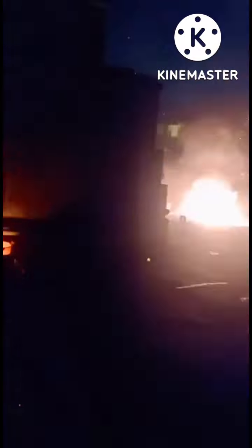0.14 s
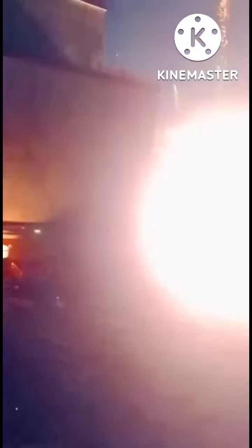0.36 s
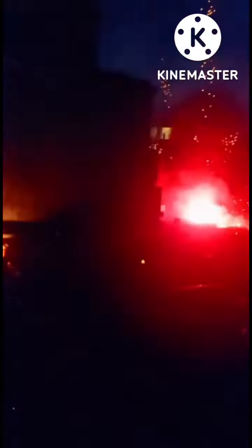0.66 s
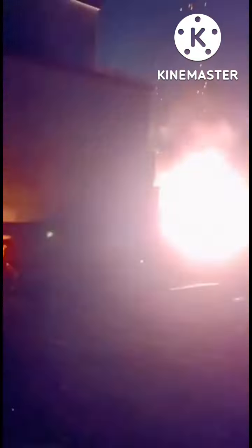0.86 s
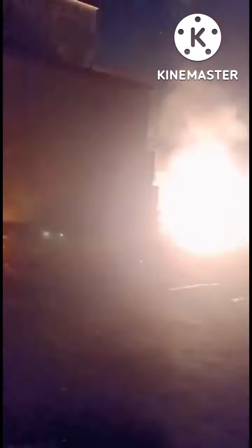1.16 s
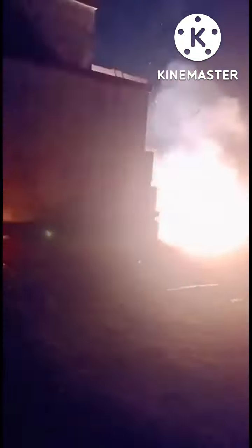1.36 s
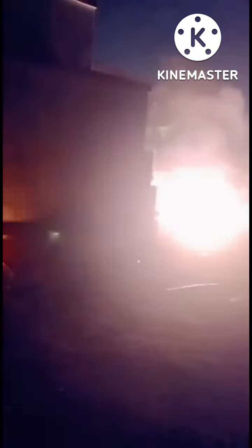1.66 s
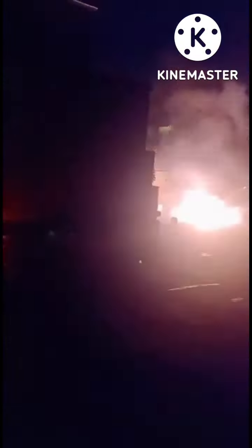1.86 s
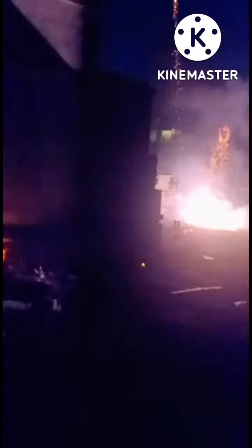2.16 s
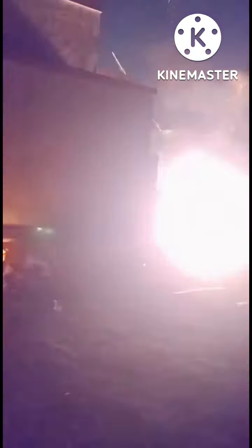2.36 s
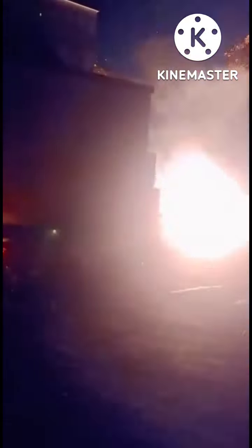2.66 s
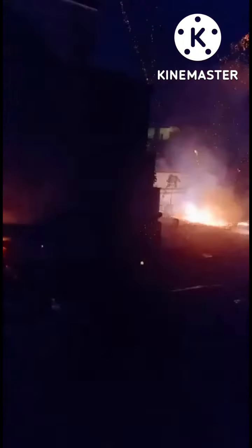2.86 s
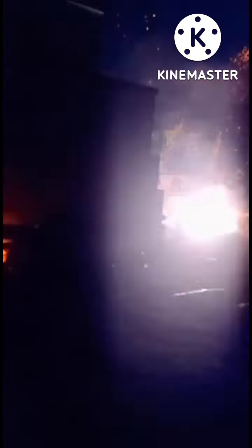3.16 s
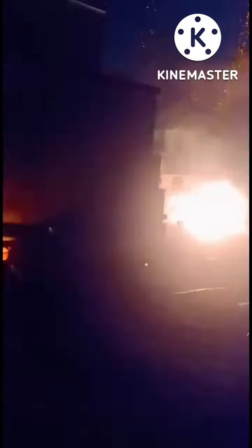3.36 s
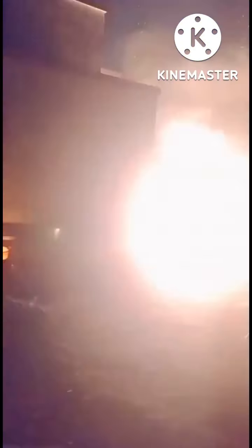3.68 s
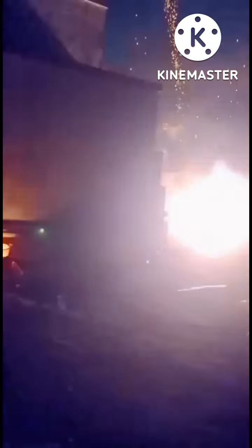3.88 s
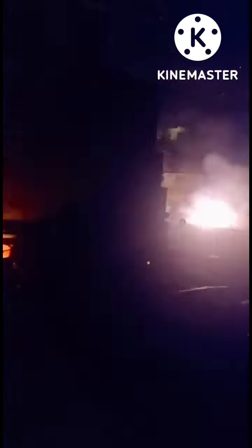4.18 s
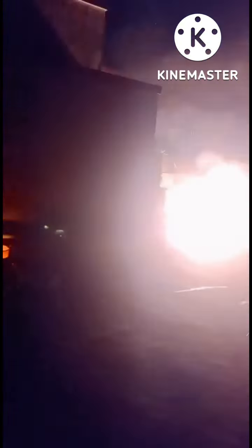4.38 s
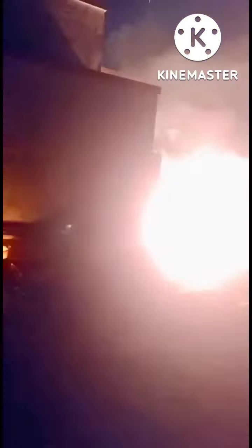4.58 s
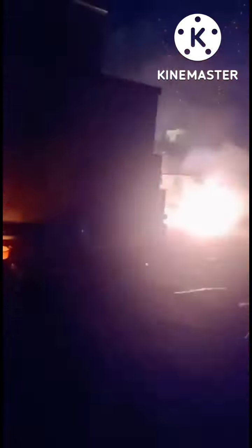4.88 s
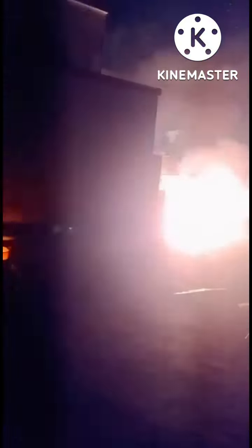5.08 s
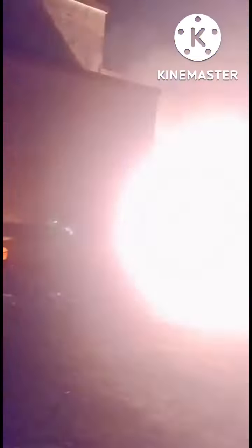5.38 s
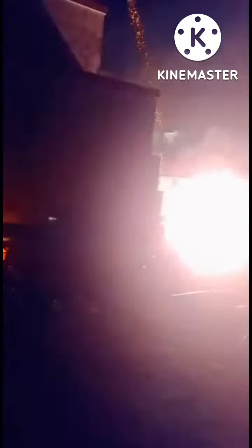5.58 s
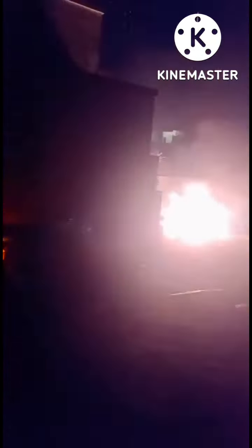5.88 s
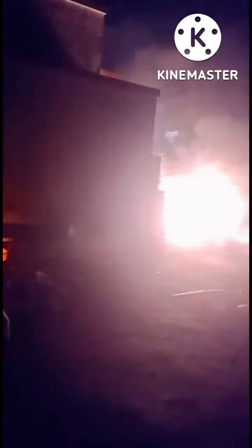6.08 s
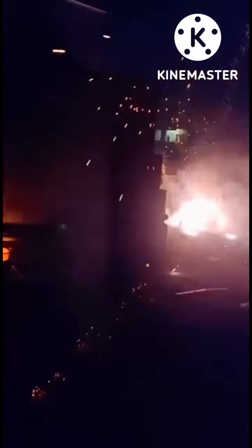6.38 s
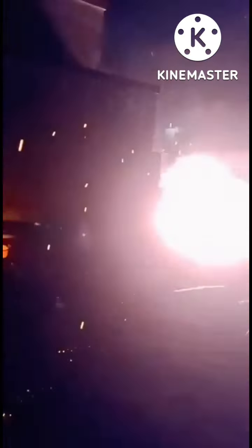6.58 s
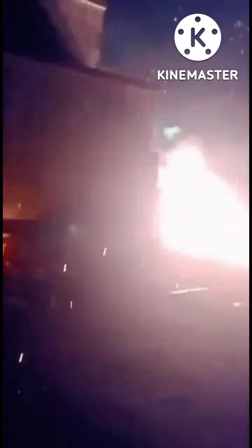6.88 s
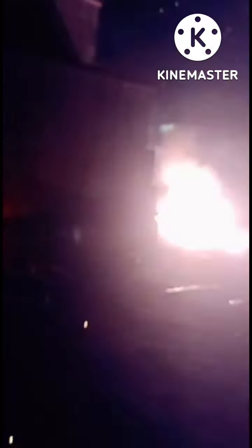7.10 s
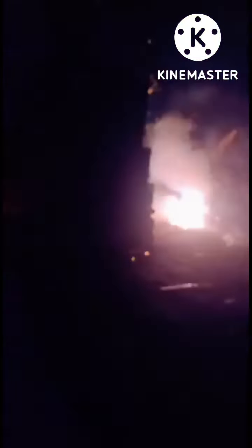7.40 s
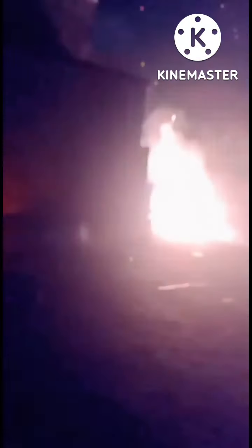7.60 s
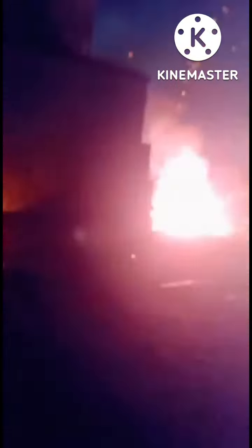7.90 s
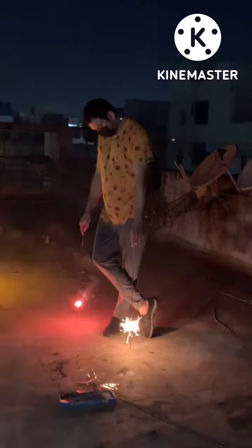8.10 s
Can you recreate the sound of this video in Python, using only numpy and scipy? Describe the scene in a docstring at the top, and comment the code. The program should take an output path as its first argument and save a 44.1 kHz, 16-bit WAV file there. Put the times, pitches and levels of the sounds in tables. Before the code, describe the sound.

A string of firecrackers goes off close by in a rapid, uneven chain of sharp bangs echoing off nearby walls.

```python
"""A string of firecrackers goes off a few metres from a stereo microphone pair in a walled street at night.
Each bang arrives as a low thump and a short crack, comes back from the near walls and dies in a grainy
rumble of far echoes. The fuse sizzles in the first pause; the neighbourhood is a faint, steady noise.
The street fades out near 8 s; after a short silence a brighter scene cuts in with a hiss and one pop."""
import sys
import numpy as np
from scipy import signal
from scipy.fft import rfft, irfft
from scipy.io import wavfile

SR = 44100
rng = np.random.default_rng(int(sys.argv[2]) if len(sys.argv) > 2 else 0)


def transcribe(signal):
    """Save signal, clipped to [-1, 1], as a 16-bit WAV file at the path in sys.argv[1]."""
    frames = np.atleast_2d(signal).T
    limited = np.clip(frames, -1, 1)
    pcm = np.round(limited * 32767).astype(np.int16)
    wavfile.write(sys.argv[1], SR, pcm)


N = 363805
SPOTS, FOLLOWERS = 6, 5   # spots on the string, each with its own echoes; weak clicks after a crack

# firecracker bangs, and some of their wall echoes about 30 ms later:
# t/s, relative crack level/dB, body/dB re crack, street send/dB re crack
ARRIVALS = [(0.0004, -18, 7, -3), (0.0224, -12.5, -10, -3.5), (0.0531, -11, -18, -10.5),
            (0.389, -34, -2, -13), (0.4201, -27.5, -11.5, -8), (0.5306, -53, 14, -22),
            (0.5966, -16, -11.5, -6.5), (0.6367, -23.5, 2.5, -6), (0.7105, -34, 0, -4.5),
            (0.8719, -16, -17, -4), (0.8988, -15, 3, -8.5), (0.941, -24, 10.5, -9), (1.077, -16, 2.5, -8.5),
            (1.1461, -11, -16, -7.5), (1.3032, -15.5, -1.5, -12.5), (1.3347, -31.5, -22, -0.5),
            (1.37, -21, 1.5, -8.5), (1.4294, -28, -2, -4.5), (1.4599, -27.5, -13, -23),
            (1.5055, -15.5, -9.5, 1), (1.5117, -4.5, -10.5, -14), (1.5728, -15.5, 9, -4),
            (1.6971, -18.5, 2, -15), (1.7879, -20.5, 1.5, 1), (1.8246, -16, 2, -8), (1.952, -13, -9.5, -2),
            (1.9828, -13.5, -28, -2.5), (2.0681, -19.5, -5, -8.5), (2.0996, -27.5, 4, -6.5),
            (2.2045, -18, -5, -1), (2.2304, -11, -16.5, -5), (2.367, -18, -32, -6.5),
            (2.419, -19, -28, -5.5), (2.4488, -24, -32, -4), (2.496, -21.5, -3, -3.5),
            (2.5595, -19.5, 0.5, -4.5), (2.618, -15, -1, 0), (2.6895, -12, -9, -8.5),
            (2.7073, -17.5, -19, -2.5), (2.7419, -20, -8, -22), (2.8484, -15.5, -2, -8.5),
            (2.9393, -17.5, -8, 0), (2.9472, -12.5, -7.5, -1.5), (3.0039, -16, -15, -16),
            (3.0709, -17.5, -15, -9), (3.3012, -42.5, 5, -4.5), (3.3672, -16.5, -27, -5),
            (3.443, -11, -16.5, -4.5), (3.5284, -26.5, 4, -7), (3.5798, -17, -1, -7.5),
            (3.6672, -22, -12, -3), (3.6825, -13, -15, -9), (3.7103, -19.5, -2, -1.5),
            (3.7378, -17, -3.5, -6), (3.7705, -23.5, 3, -17), (3.8259, -14.5, -18, -5.5),
            (3.8564, -21, -12, -6), (3.9371, -15.5, -23, -6), (4.0159, -15.5, -11, -3),
            (4.0475, -16.5, -10, -19), (4.146, -11.5, -20, -7.5), (4.1933, -11.5, -18, -8.5),
            (4.268, -18, -14, -6), (4.336, -19, -7, -9.5), (4.3945, -19, -3, -7), (4.5381, -21.5, -40, -16),
            (4.5707, -34.5, -18, -6), (4.5972, -32.5, -1, -6), (4.655, -29.5, 5, -10.5),
            (4.6802, -30.5, 0, -5.5), (4.7357, -9.5, -22, 0), (4.9184, -13.5, -17, 1),
            (4.933, -12, -10, -5.5), (4.9911, -13, -6, -5.5), (5.0419, -20, -15, -25),
            (5.1359, -12.5, -24, -11), (5.1472, -17, -25, -1), (5.1667, -16.5, -27, -7.5),
            (5.2123, -16, -19, -4.5), (5.2523, -19, -6, -16), (5.2827, -15.5, -0.5, -5.5),
            (5.3106, -11.5, -18, -3), (5.3208, -17, -13, -11), (5.3532, -14.5, -20, -14),
            (5.3803, -15.5, -6, -1.5), (5.3964, -17.5, -10, -0.5), (5.4307, -20.5, -16, -4),
            (5.5569, -28.5, 10, -2), (5.5957, -24, -3, -3.5), (5.6296, -9.5, -8, -9.5),
            (5.6531, -18, -25, -7), (5.682, -15.5, -33, -5.5), (5.7443, -31, 2, -3.5),
            (5.7769, -12, -34, -8.5), (5.8112, -13.5, -27, -19), (5.827, -24.5, -4, -1),
            (5.873, -33.5, 18, -10), (5.8975, -30.5, 9, -5), (5.9274, -38.5, 16.5, 2),
            (5.961, -36.5, 12, -9), (6.0097, -13.5, -11, -7), (6.0561, -29.5, 8, -5),
            (6.1161, -31.5, 10.5, 6.5), (6.1447, -12.5, -4.5, -2), (6.1811, -12, -21, -23),
            (6.2897, -14, -2.5, -1), (6.3414, -10, -10.5, -12.5), (6.5195, -38.5, 4, -3.5),
            (6.6057, -14.5, -28, -6.5), (6.6345, -18.5, -22, -10), (6.7476, -26.5, 2, -15),
            (6.8277, -20.5, 3.5, -7.5), (6.8678, -35.5, 23, -26), (6.9582, -25.5, 9, -0.5),
            (6.983, -10.5, -12, -7), (7.012, -8.5, -8, -9), (7.0433, -28, -9, -1.5), (7.238, -37, 8, -5),
            (7.3722, -12.5, -6, -7.5), (7.4739, -26.5, 10.5, -3), (7.5098, -26, -7, -1),
            (7.5292, -13, -2, -11.5), (7.5662, -17, 3, -9), (7.6148, -29, 13, -2), (7.6552, -24.5, 1, -18),
            (7.7251, -12.5, -7, -12), (7.756, -18.5, 8, -6.5), (7.7924, -17, -14, -17),
            (7.8253, -8.5, -27, -3), (7.8615, -14.5, -6, -12), (7.9789, -28.5, 8.5, -2.5)]


def firecrackers():
    """Each arrival, bang or wall echo, takes on the near walls and far echoes of one random spot."""
    draws = rng.random((len(ARRIVALS), 2 * FOLLOWERS + 2))
    arrivals = with_snap(ARRIVALS, draws[:, 1])
    chosen_spot = (draws[:, 0] * SPOTS).astype(int)
    mic_draws = draws[:, 2:].reshape(-1, 2, FOLLOWERS)
    out = thump(arrivals, mic_draws)
    for spot, (near, far) in enumerate(zip(near_walls(), far_echoes())):
        here = chosen_spot == spot
        band_scale = 1 + 0.45 * (2 * spot / (SPOTS - 1) - 1)   # each spot cracks lower or higher
        out = out + convolve(blast(arrivals[here], mic_draws[here], band_scale), near)
        out = out + from_db(-15) * convolve(street_send(arrivals[here]), far)
    return out


# treble snap as the string burns along: t/s, base level/dB re crack
SNAP_TREND = [(0, -14), (.3, -22.5), (.6, -13), (1.4, -14.5), (2.2, -13.5), (3.0, -15), (3.7, -10),
              (4.3, -16), (4.9, -16), (5.8, -14.5), (6.4, -13.5), (6.9, -10), (7.4, -14), (8.0, -13.5)]


def with_snap(arrivals, draws):
    """Add a snap column (dB re crack): what carries further into the street is brighter."""
    t, crack_db, body_db, street_db = np.transpose(arrivals)
    snap_db = np.interp(t, *np.transpose(SNAP_TREND))
    snap_db += 0.69 * street_db + 0.13 * crack_db + 0.033 * body_db
    snap_db += 3 * (2 * draws - 1)
    return np.transpose([t, crack_db, body_db, snap_db, street_db])


def thump(arrivals, mic_draws):
    """The pressure step: a short thump that the walls hardly return, unequal at the two microphones."""
    t, crack_db, body_db, _, _ = arrivals.T
    level_db = 16.5 + crack_db + 0.16 * body_db
    steps = [clicks(t, level_db + 20 * (mic_draws[:, mic, 0] - 0.5)) for mic in range(2)]
    return lowpass(np.array(steps), 119.5)


def blast(arrivals, mic_draws, band_scale):
    """Low body, mid crack and treble snap of each arrival."""
    t, crack_db, body_db, snap_db, _ = arrivals.T
    lean_db = 12 * (mic_draws[:, :, 1] - 0.5)   # the body hits one microphone harder, differently each time
    body = lowpass(np.array([clicks(t, crack_db + body_db + lean_db[:, mic]) for mic in range(2)]), 606)
    crack = highpass(burst(t, crack_db, mic_draws), 1290 * band_scale)
    crack = lowpass(crack, 3860 * band_scale)
    snap = highpass(burst(t, crack_db + snap_db, mic_draws), 1710)
    return from_db(11) * body + from_db(13.5) * crack + from_db(28) * snap


def burst(t, level_db, mic_draws):
    """A click with weaker followers within 2.5 ms (ground bounce, tearing paper), apart for each side."""
    out = np.array([clicks(t, level_db)] * 2)
    for mic in range(2):
        for k in range(FOLLOWERS):
            lag_s = 0.0001 + 0.0024 * mic_draws[:, mic, k]
            out[mic] += (-1) ** (k + 1) * clicks(t + lag_s, level_db - 4 - 5000 * lag_s)
    return out


# echoes off the near walls, before each spot varies them: delay t/s, left level/dB, right level/dB
WALL_ECHOES = [(.0038, -7.5, -9.5), (.0069, -13.5, -4.5), (0.0278, -28, -16), (0.0355, -9.5, -10.5)]


def near_walls():
    """Direct sound plus a few distinct echoes; the paths change from spot to spot."""
    responses = np.zeros((SPOTS, 2, SR // 10))
    responses[:, :, 0] = 1
    for delay_s, left_db, right_db in WALL_ECHOES:
        for response in responses:
            tap = int(delay_s * (1 + 0.02 * rng.uniform(-0.92, 1)) * SR)
            response[:, tap] = from_db(np.array([left_db, right_db]) + rng.uniform(-8.7, 3, 2))
    return responses


def street_send(arrivals):
    """What goes down the street keeps part of its own colour: fuller or thinner, brighter or duller."""
    t, crack_db, body_db, snap_db, street_db = arrivals.T
    sent_db = crack_db + street_db
    low = lowpass(clicks(t, sent_db + 0.43 * (body_db + 8)), 1830)
    middle = lowpass(highpass(clicks(t, sent_db), 1320), 4850)
    high = highpass(clicks(t, sent_db + 1.17 * (snap_db + 17.5)), 3500)
    return low + middle + high


# decay down the street: f/Hz, relative level/dB, early T60/s, late T60/s, late level/dB re early
STREET_DECAY = [(50, 9, 0.17, .4, -23), (124, 7.5, 0.037, 1.8, -24), (264, 3.5, 0.31, 0.62, -22),
                (840, 2.5, 0.34, 1.46, -27.5), (2060, 2.5, 0.16, 0.33, -5.5), (4740, 7.5, 0.22, 2.3, -39.5),
                (12000, 6.5, 0.16, 0.41, -20.5)]
# far echoes scattered into even hiss: f/Hz, share of the power
SCATTERED_SHARE = [(300, 0.094), (2000, 0.76), (8000, 0.39)]
# likeness of the far echoes at the two microphones: f/Hz, correlation
MIC_CORRELATION = [(60, 1), (180, 1), (550, 1), (1650, 0.15), (4970, 0.16), (15000, 0.056)]


def far_echoes(echoes_per_s=1100, spread_db=7, build_s=0.0055, hold_s=0.03):
    """For each spot, many small reflections of uneven size build up, hold, then die on two slopes."""
    t = np.arange(SR) / SR
    decay_s = np.maximum(t - hold_s, 0)
    shape = (2, SPOTS, len(t))
    sizes = from_db(spread_db * np.minimum(rng.exponential(1, shape), 4))
    grains = unit_rms(sizes * rng.choice([-1, 1], shape) * (rng.random(shape) < echoes_per_s / SR))
    hiss = rng.standard_normal(shape)
    edges_hz = 30 * 2 ** np.arange(0, 9.6, 0.5)   # half octaves
    out = 0
    for low, high in zip(edges_hz, edges_hz[1:]):
        hz = np.sqrt(low * high)
        scattered, = at_hz(SCATTERED_SHARE, hz)
        correlation, = at_hz(MIC_CORRELATION, hz)
        level_db, early_t60, late_t60, late_db = at_hz(STREET_DECAY, hz)
        mid, side = bandpass(np.sqrt(1 - scattered) * grains + np.sqrt(scattered) * hiss, low, high)
        mid, side = np.sqrt(1 + correlation) * mid, np.sqrt(1 - correlation) * side
        early = from_db(level_db - 60 * decay_s / early_t60)
        late = from_db(level_db + late_db - 60 * decay_s / late_t60)
        out = out + (early + late) * np.stack([mid + side, mid - side], axis=1)
    return out * (1 - np.exp(-t / build_s))


# sizzle of the fuse: t/s, relative level/dB
FUSE_LEVEL = [(.1, -77), (.25, -71), (.36, -64), (.47, -77), (.56, -93)]


def fuse():
    """The burning fuse: a thin bright sizzle, heard in the first pause between bangs."""
    burning = np.arange(N) < FUSE_LEVEL[-1][0] * SR
    sizzle = unit_rms(bandpass(rng.standard_normal((2, N)), 3500, 11200))
    return burning * from_db(in_time(FUSE_LEVEL)[0]) * sizzle


# the pop in the second scene: t/s, level/dB
POP = [(8.2399, -5.5)]


def hollow_pop(ring_hz=1000, bandwidth_hz=400):
    """One click rings a quickly damped resonance, the same left and right."""
    pole, angle = np.exp(-np.pi * bandwidth_hz / SR), 2 * np.pi * ring_hz / SR
    click = clicks(*np.transpose(POP))
    ring = signal.lfilter([0, np.sin(angle)], [1, -2 * pole * np.cos(angle), pole ** 2], click)
    return lowpass(ring, 2800)


# swell of the second scene's hiss: t/s, low band level/dB, high band level/dB
HISS_SWELL = [(8.135, -49, -78), (8.146, -38, -47.5), (8.186, -36.5, -44), (8.2, -31, -24.5),
              (8.22, -37, -31), (8.25, -19, -43)]
# its colour before the two bands are levelled: f/Hz, relative level/dB
HISS_SPECTRUM = [(30, -11), (110, -1), (500, 0.5), (1700, -9), (3000, -18.5), (7000, -11.5), (12000, -16.5),
                 (15500, -8.5)]


def bright_hiss(crossover_hz=2400):
    """Wide bright hiss that swells in once the street has faded."""
    noise = coloured_noise(HISS_SPECTRUM)
    low_db, high_db = in_time(HISS_SWELL)
    low = from_db(low_db) * unit_rms(lowpass(noise, crossover_hz))
    high = from_db(high_db) * unit_rms(highpass(noise, crossover_hz))
    started = np.arange(N) > HISS_SWELL[0][0] * SR
    return started * (low + high)


# night air ahead of the microphones: f/Hz, relative level/dB
NIGHT_SPECTRUM = [(40, -35), (150, -19), (600, 9.5), (2500, 3), (6000, -3.5), (14000, -6)]


def neighbourhood():
    """Steady noise from far beyond the street."""
    return from_db(-62.5) * coloured_noise(NIGHT_SPECTRUM)


# response common to both microphones: f/Hz, relative level/dB
MIC_RESPONSE = [(18, -79), (30, -29), (86, -11.5), (276, 2.5), (506, -0.5), (659, 0), (1270, -8),
                (1420, -12.5), (2050, -6), (2350, -5), (2650, -8), (3300, -16.5), (5300, -22),
                (7090, -16.5), (9300, -26), (12300, -39.5), (14800, -37.5), (16500, -93)]
# left microphone minus right, before limiting: f/Hz, level/dB
MIC_IMBALANCE = [(30, -17.5), (60, -2), (95, 32), (150, -8.5), (240, 2), (380, -5.5), (600, 5.5),
                 (950, -2.5), (1500, 1.5), (2380, -8), (3770, -1), (5980, -6.5), (9470, 3.5), (15000, -10)]


def microphones(right_lag_samples=5):
    """The pair dulls the treble; the right one rings near 2.3 kHz and hears the source a little later."""
    hz = np.linspace(0, SR / 2, 2049)
    common_db, = at_hz(MIC_RESPONSE, hz)
    imbalance_db = np.clip(at_hz(MIC_IMBALANCE, hz)[0], -9, 5)
    left = minimum_phase(common_db + imbalance_db / 2)
    right = minimum_phase(common_db - imbalance_db / 2)
    pair = np.array([left, np.roll(right, right_lag_samples)])
    return pair / np.abs(pair).max()


def from_db(db):
    """Decibels to gain."""
    return 10 ** (np.asarray(db) / 20)


def unit_rms(x):
    """Scale to rms 1."""
    return x / np.sqrt(np.mean(x ** 2) + 1e-20)


def at_hz(table, hz):
    """Read a table on a log-frequency axis; one array per column."""
    centres, *columns = np.transpose(table)
    return [np.interp(np.log(np.maximum(hz, 1)), np.log(centres), c) for c in columns]


def in_time(table):
    """Read a table at every sample; one array per column."""
    t, *columns = np.transpose(table)
    return [np.interp(np.arange(N) / SR, t, c) for c in columns]


def clicks(t, level_db):
    """One click for each time."""
    out = np.zeros(N)
    np.add.at(out, np.minimum((np.asarray(t) * SR).astype(int), N - 1), from_db(level_db))
    return out


def convolve(x, response):
    """Linear convolution along time, cut to length."""
    return signal.fftconvolve(np.atleast_2d(x), np.atleast_2d(response), axes=1)[:, :N]


def minimum_phase(level_db):
    """Response for levels on an even frequency grid: nothing rings before the hit."""
    cepstrum = irfft(level_db * np.log(10) / 20)
    half = len(cepstrum) // 2
    cepstrum[1:half] *= 2
    cepstrum[half + 1:] = 0
    return irfft(np.exp(rfft(cepstrum)))[:half]


def coloured_noise(spectrum):
    """Independent left and right noise with the given spectrum."""
    response = minimum_phase(at_hz(spectrum, np.linspace(0, SR / 2, 1025))[0])
    return convolve(rng.standard_normal((2, N)), response)


def lowpass(x, hz):
    """Low side of a crossover."""
    return signal.sosfilt(signal.butter(2, hz, "low", fs=SR, output="sos"), x + 1e-18)


def highpass(x, hz):
    """High side of a crossover, inverted so that it adds up with the low side."""
    return -signal.sosfilt(signal.butter(2, hz, "high", fs=SR, output="sos"), x + 1e-18)


def bandpass(x, low_hz, high_hz):
    """The band between two edges."""
    return signal.sosfilt(signal.butter(2, [low_hz, high_hz], "band", fs=SR, output="sos"), x)


# fader on the street, sinking slowly and closing near 8 s: t/s, level/dB
STREET_FADER = [(0, -1.5), (7.99, -5), (8.05, -9), (8.11, -25.5), (8.128, -59), (8.131, -87), (8.25, -75)]


def scene():
    """The street at the microphone pair, faded out, then the second scene's hiss and pop."""
    street = convolve(firecrackers() + neighbourhood(), microphones()) + fuse()
    return street * from_db(in_time(STREET_FADER)[0]) + bright_hiss() + hollow_pop()


def record(dry, ceiling=0.85, cutoff_hz=16900):
    """The recorder rounds the peaks and cuts the top of the treble."""
    rounded = ceiling * np.tanh(dry / ceiling)
    return signal.sosfilt(signal.cheby2(14, 85, cutoff_hz, fs=SR, output="sos"), rounded)


dry = scene()
out = record(dry)
transcribe(out)
```